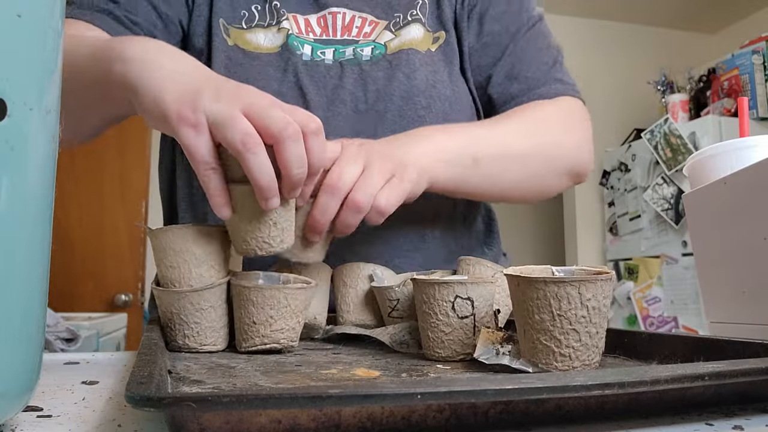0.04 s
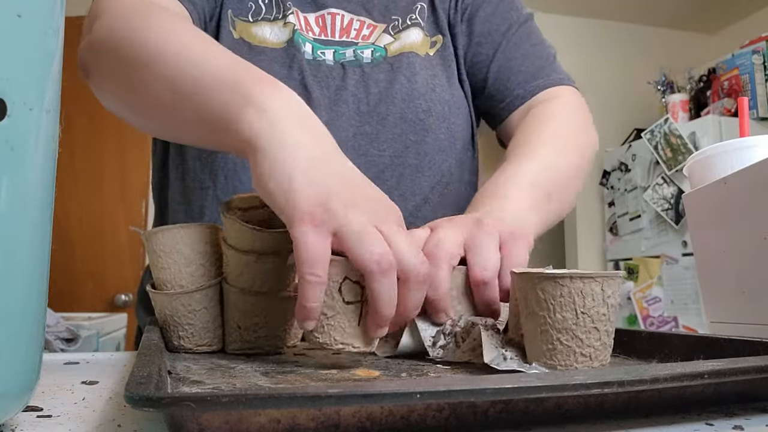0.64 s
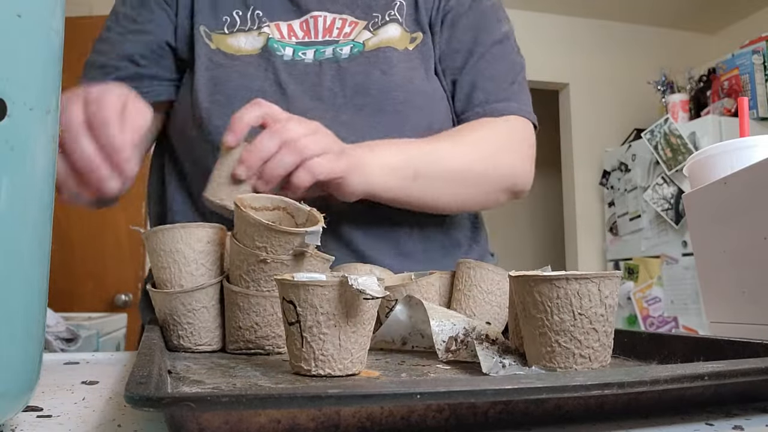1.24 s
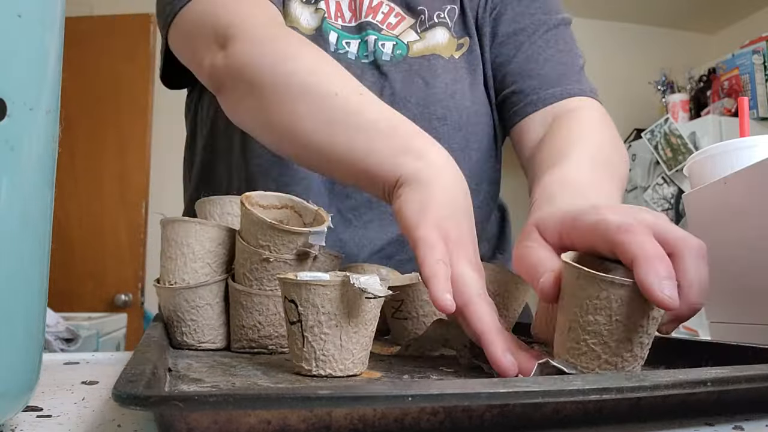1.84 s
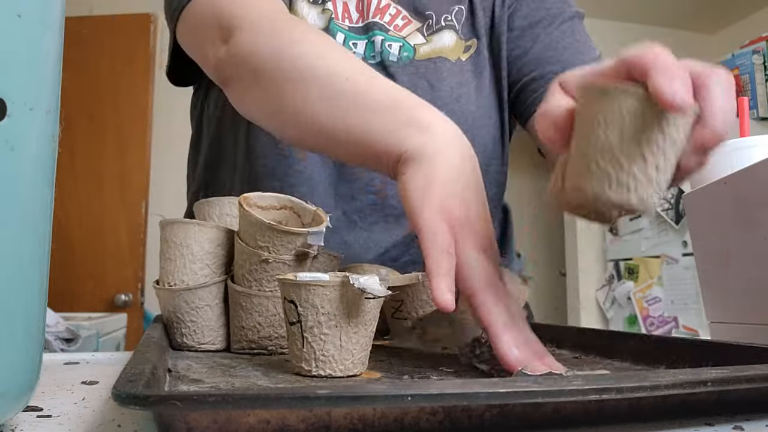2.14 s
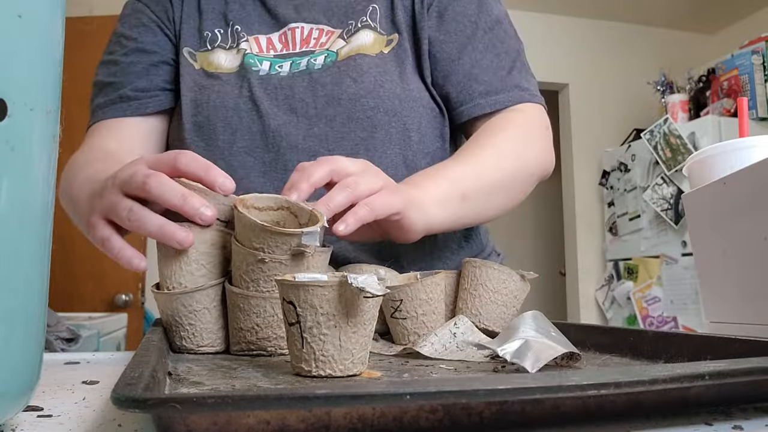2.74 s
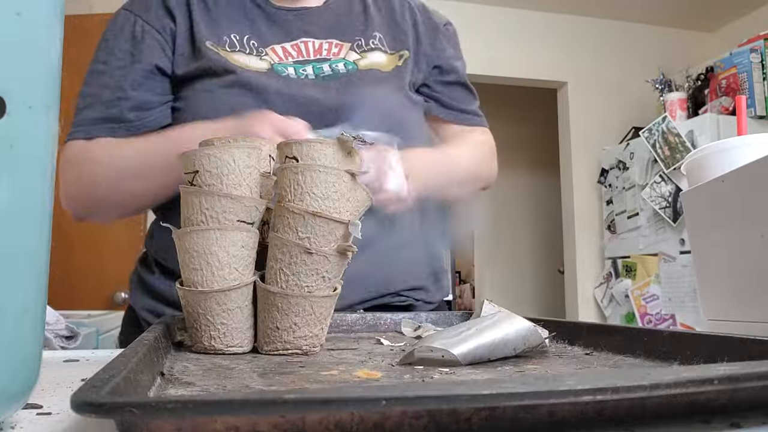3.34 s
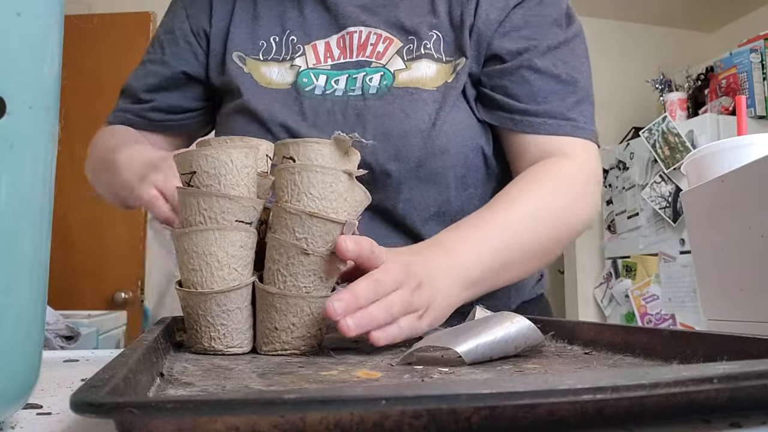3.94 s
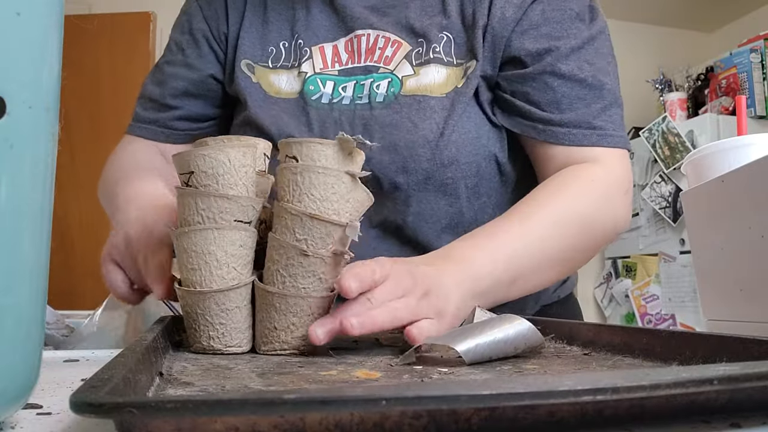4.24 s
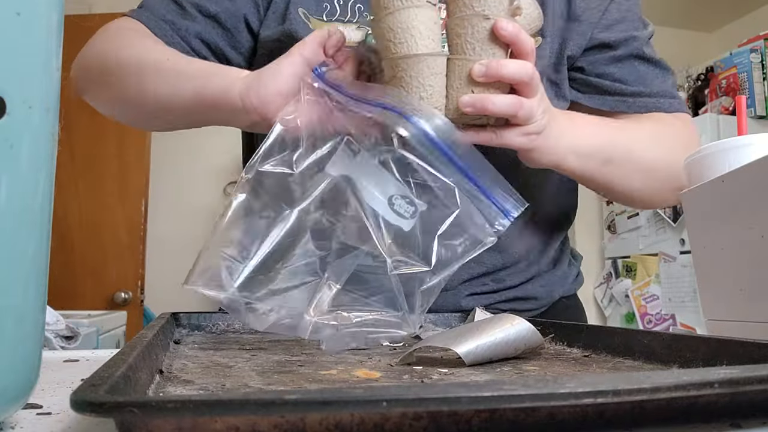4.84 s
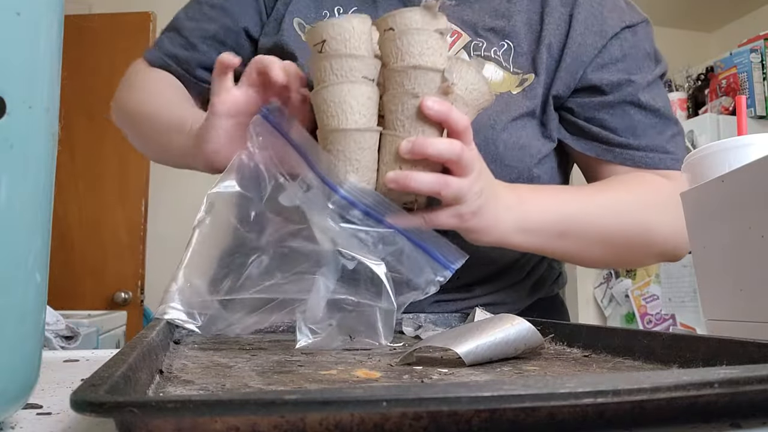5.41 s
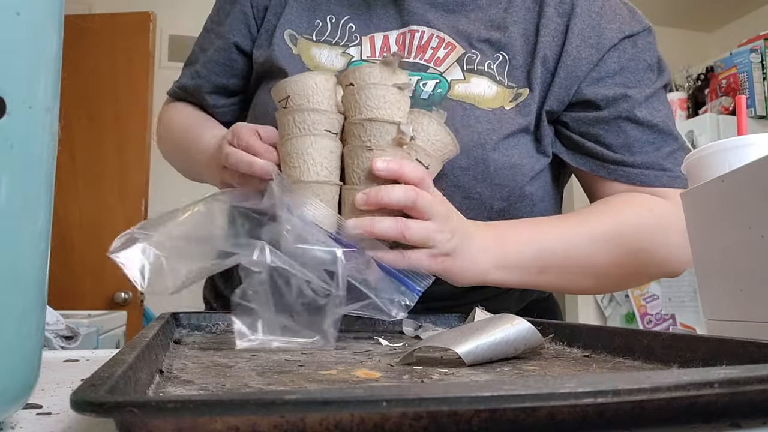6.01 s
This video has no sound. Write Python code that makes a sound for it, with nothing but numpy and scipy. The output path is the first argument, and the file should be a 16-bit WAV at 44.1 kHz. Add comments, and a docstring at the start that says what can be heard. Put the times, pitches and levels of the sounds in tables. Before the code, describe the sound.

Fibre plant pots knock and scrape on a metal tray, a foil packet snaps, then a plastic bag is shaken and crinkles.

```python
"""Fibre plant pots knock and rasp as they are nested and set down on a metal baking tray, close up in a
small kitchen. Their rough walls catch and slip, the tray booms under them, and a pressed foil seed
packet snaps as its creases flip. From 3.2 s a plastic zip bag is shaken open: it crinkles, flaps and
hisses, wall on wall, while the stacks are gathered up. Arms bump softly against stacks and bag."""
import sys
import numpy as np
from scipy import signal
from scipy.fft import rfft, irfft
from scipy.io import wavfile
from scipy.ndimage import uniform_filter1d

SR = 44100
rng = np.random.default_rng(int(sys.argv[2]) if len(sys.argv) > 2 else 0)


def file_out(sig):
    """Save sig as 16-bit WAV at sys.argv[1]."""
    # one column per channel
    cols = np.atleast_2d(sig).T
    # limit, then scale
    lim = np.clip(cols, -1, 1)
    pcm = np.round(lim * 32767).astype(np.int16)
    wavfile.write(sys.argv[1], SR, pcm)


N = 272097
TIME_S = np.arange(N) / SR
SCENE_CHANGE_S = 3.18  # the scene changes from pots to bag

# All levels are relative.
# pot on tray or pot: t/s, level/dB, hardness cutoff/Hz, tray boom/dB, hollow note/dB, clack/dB
POT_KNOCKS = [(0.07, -46.5, 497, -8, -17, -25), (0.2544, -30.5, 870, -21, -1.5, -17),
              (0.3476, -35, 900, -26, -0.5, -19), (.777, -28, 1210, -17, -17, -4),
              (.784, -24, 640, -4.5, -15, -23), (0.9793, -31.5, 1510, -20, -2.5, -15.5),
              (1.323, -47.5, 890, -20, -15, -14), (1.357, -43, 495, -16, -9, -27),
              (1.414, -51.5, 407, -1, -12, -8), (1.722, -46, 497, -17, -8, -4),
              (2.1684, -31, 645, -12.5, -1.5, -16.5), (2.276, -33.5, 556, -26, -15, -14.5),
              (2.882, -47, 600, -30, -20, -20)]
# loaded tray: f/Hz, level/dB, t60/s
TRAY_MODES = [(118, -23, 0.17), (159.7, 0, 0.32), (176.8, 6, 0.19), (216, -4, 0.26), (243, 3, 0.15),
              (267.4, -4, 0.33), (322, 5.5, 0.12), (386, 4.5, 0.13), (446, 0, 0.35), (500, 3.5, 0.18),
              (651, 1, 0.18), (720, -3.5, 0.34), (705, 3.5, 0.39), (966, -0.5, 0.4), (1580, -4, .13)]
# pot sliding in a pot or under fingers: peak t/s, rise/s, fall/s, rasp/dB, shudder/dB, fizz offset/dB
POT_SLIDES = [(0.108, 0.04, 0.065, -43.5, -43.5, -18), (0.197, 0.027, 0.045, -39, -37, -47),
              (.312, 0.056, 0.026, -48, -49, -16), (.371, 0.023, 0.053, -43.5, -41, -9),
              (0.46, 0.04, 0.21, -49, -53, -34), (.745, 0.038, 0.071, -50, -59.5, -25),
              (0.784, 0.016, 0.097, -44, -45, -47), (.936, 0.032, 0.022, -47.5, -48.5, -13.5),
              (1.331, 0.0045, 0.052, -51.5, -48, -23), (1.523, 0.11, 0.075, -59, -57.5, -12),
              (1.713, 0.044, 0.02, -39.5, -41.5, -14.5), (1.77, 0.039, 0.062, -53.5, -50, -17),
              (1.855, 0.0035, 0.061, -38.5, -46.5, -19), (1.912, 0.018, 0.02, -47, -42, 1.5),
              (2.146, 0.02, 0.023, -41.5, -49.5, -4), (2.301, 0.0097, 0.005, -45, -47, 0.5),
              (2.471, 0.08, 0.049, -50, -55.5, -21), (2.621, 0.073, 0.088, -52.5, -52, -15.5),
              (2.83, 0.09, 0.22, -56.5, -57.5, -38), (2.99, 0.024, 0.079, -53, -54, -29),
              (3.11, 0.058, 0.048, -51.5, -54.5, -37)]
# pot spectra: f/Hz, level/dB
WALL_THUD = [(50, -14.5), (130, 2.5), (400, -0.5), (800, 1.5), (1100, -0.5), (2000, -6), (5000, -18),
             (12000, -37.5)]
RIM_CLACK = [(700, -24), (1400, 1.5), (1650, 7), (1850, -13), (2100, 5.5), (2600, -5), (9000, -24.5)]
WALL_RASP = [(500, -57.5), (1100, -6), (2000, 6.5), (3500, 6.5), (5500, 5), (8000, -1.5), (11000, -9.5),
             (16000, -15.5)]
FIBRE_FIZZ = [(2000, -25.5), (5000, -4), (8000, -7), (16000, -16.5)]
STACK_SHUDDER = [(50, -30.5), (110, -8), (185, -3.5), (300, -13.5), (400, -7.5), (550, -18.5), (750, -7),
                 (880, -12), (1100, -7.5), (1600, -16), (3000, -51)]
# foil creases flipping: t/s, level/dB, ring f/Hz, ring/dB, pop/dB, crack time constant/s
FOIL_CREASES = [(.3828, -25, 5600, -6, -11, 0.0011), (.3857, -13.5, 5520, -9, -13, 0.00037),
                (.3878, -17, 5630, -1.5, -18, 0.00042), (.4143, -15.5, 5210, -5, -7.5, 0.0018),
                (.4200, -19.5, 5150, 2, 3, 0.0012), (.4706, -15.5, 5000, -6, -4.5, 0.0006),
                (.5008, -29.5, 3250, -12, 1, 0.00062), (.5208, -18, 3420, -11.5, -4, 0.00063)]
# foil crack spectrum: f/Hz, level/dB
FOIL_CRACK = [(200, -23), (450, -22), (750, -15), (1100, -14.5), (2100, -4), (3300, -5), (5300, 0),
              (8000, -7), (11000, -9.5), (16000, -25)]
# arms against stacks and bag: t/s, half width/s, level/dB, low spectral peak f/Hz
ARM_BUMPS = [(2.273, 0.085, -45.5, 54), (4.699, 0.19, -53, 67.4), (6.055, 0.016, -42.5, 71)]
# soft handling spectrum, low peak at 55 Hz: f/Hz, level/dB
SOFT_RUMBLE = [(15, -16), (35, -8.5), (55, 3), (80, 0), (120, 3), (200, -5), (400, -52)]
# bag shaken, then shifted: peak t/s, rise/s, fall/s, crinkle/dB, flap/dB, pushed air/dB
BAG_MOTION = [(3.25, 0.041, 0.13, -25.5, -31.5, -45), (3.5, 0.03, 0.1, -45.5, -62, -74),
              (3.6, 0.036, 0.016, -36.5, -41.5, -58), (3.77, 0.057, 0.02, -51, -46, -55.5),
              (3.92, 0.072, 0.056, -44, -46.5, -53.5), (4.06, 0.053, 0.041, -45.5, -50, -59),
              (4.32, 0.066, 0.11, -50.5, -48, -58.5), (4.54, 0.078, 0.063, -49, -51.5, -58.5),
              (4.76, 0.14, 0.17, -50, -53, -56.5), (5.17, 0.1, 0.21, -43, -47, -58.5),
              (5.35, 0.038, 0.024, -43.5, -55, -66), (5.46, 0.05, 0.086, -43.5, -49, -52.5),
              (5.61, 0.048, 0.026, -39.5, -38, -48), (5.73, 0.063, 0.13, -39.5, -48, -53),
              (5.95, 0.086, 0.09, -39, -50.5, -55), (6.07, 0.046, 0.026, -39.5, -40.5, -46),
              (6.168, 0.025, .03, -40.5, -41, -61)]
# loudest bag creases: t/s, level/dB, ring f/Hz, ring/dB, crack time constant/s
BAG_CREASES = [(3.2011, -19, 5310, -11, 0.0013), (3.208, -26, 3980, -4, .0008),
               (3.2226, -15, 6230, -14, 0.00063), (3.228, -17.5, 6200, -13, 0.0022),
               (3.2625, -28, 4500, -6, 0.00072), (3.281, -22, 5400, -6, 0.00044),
               (3.306, -26, 4830, -2, 0.00077), (3.3195, -22.5, 5220, -13, 0.001),
               (3.369, -23, 3500, -8.5, 0.0058), (3.4619, -28, 5960, -10, 0.00058),
               (3.477, -40, 1990, 11, .002), (3.525, -40, 1650, -5, 0.0017),
               (3.580, -32.5, 4720, -7, 0.0036), (3.591, -47, 2240, -10, 0.0033),
               (3.659, -45.5, 2110, -9, 0.00089), (3.7236, -43.5, 3000, -16, 0.0019),
               (3.76, -36, 2220, -8, 0.0027), (3.766, -39, 1710, -1, 0.0017),
               (3.809, -40.5, 2970, -5, 0.003), (3.8437, -40.5, 3080, -18, 0.001),
               (3.86, -45.5, 2200, -4, 0.001), (4.012, -40.5, 1060, -5, 0.0044),
               (4.727, -39.5, 3480, -29, 0.00049), (4.772, -37, 3080, -10, 0.00083),
               (4.797, -48, 3180, 4, 0.0017), (5.0462, -39.5, 4950, -17, 0.00097),
               (5.1218, -31.5, 4770, -13, 0.0019), (5.1812, -28.5, 3200, -5.5, 0.0017),
               (5.2026, -31, 5640, 1, 0.00069), (5.4119, -34, 7750, -13, 0.00044),
               (5.419, -35.5, 1600, 1.5, 0.0016), (5.582, -40, 3210, -13, 0.0015),
               (5.6212, -33, 4100, -7, 0.0027), (5.7039, -27.5, 5630, -18, 0.0015),
               (5.739, -31, 5240, -6.5, 0.001), (5.7739, -28.5, 3200, -9.5, 0.00024),
               (5.8483, -29, 3220, 10, 0.0009), (5.8486, -36, 2180, 2, 0.001),
               (6.059, -41, 5900, -20, 0.00065)]
# bag wall sliding on wall: peak t/s, rise/s, fall/s, level/dB
BAG_SLIDES = [(5.125, 0.063, .022, -51), (5.18, 0.027, .028, -58), (5.45, 0.036, 0.058, -48.5),
              (5.71, 0.033, 0.023, -44.5), (5.74, 0.004, 0.0041, -34), (5.96, 0.18, 0.14, -56)]
# bag spectra: f/Hz, level/dB
BAG_CRINKLE = [(300, -13), (700, -7), (1100, 3.5), (1700, 2.5), (3200, -2), (5400, -2), (8000, -9.5),
               (11000, -18.5), (16000, -28)]
BAG_FLAP = [(100, -28), (230, -5.5), (380, -3.5), (600, -4), (800, -1.5), (1100, 2), (1600, 1),
            (3000, -53.5)]
FILM_HISS = [(1000, -40), (3000, -5), (7000, -1.5), (10500, -6.5), (16000, -10)]
# still kitchen air: f/Hz, level/dB
ROOM_AIR = [(20, 8), (120, -2.5), (450, -8.5), (700, -12), (1500, -36), (5500, -13), (8000, -13.5),
            (16000, -35.5)]
# kitchen decay: f/Hz, t60/s
ROOM_T60 = [(100, 0.38), (300, 0.28), (800, 0.13), (2000, 0.19), (5000, 0.2), (9000, 0.14), (16000, 0.24)]
# microphone pair: f/Hz, left-right correlation
MIC_CORRELATION = [(100, 0.99), (300, 0.97), (700, 0.82), (1200, -0.37), (2000, -0.36), (5000, 0.015),
                   (16000, -0.072)]
# microphone response, common and left over right: f/Hz, level/dB
MIC_RESPONSE = [(950, 0.5), (1110, 1), (1300, -11.5), (1480, -5), (1700, -4), (2130, -1), (2500, -4),
                (3350, 2.5), (4300, -0.5), (5400, 0), (6700, -3.5), (8100, -4.5), (9400, -16), (10500, -14),
                (12500, -7.5)]
MIC_BALANCE = [(250, 0.5), (1000, 0), (2000, -2.8), (4500, 1), (8000, 0.5), (12000, -1)]


def amp(db):
    """dB to gain."""
    return 10 ** (np.asarray(db) / 20)


def unit(x):
    """Scale to rms 1."""
    return x / np.sqrt(np.mean(x ** 2) + 1e-20)


def with_energy(x, energy):
    """Scale to a mean sum of squares per channel."""
    return unit(x) * np.sqrt(energy / x.shape[-1])


def lookup(table, hz):
    """Interpolate over log frequency."""
    table_hz, value = np.transpose(table)
    return np.interp(np.log(hz + 1), np.log(table_hz + 1), value)


def add(mix, at_s, sound):
    """Mix in a stereo sound."""
    part = mix[:, max(round(at_s * SR), 0):][:, :sound.shape[1]]
    part += sound[:, :part.shape[1]]


def colour(x, spectrum, size=4096):
    """Minimum-phase filter with the given spectrum."""
    log_gain = np.log(amp(lookup(spectrum, abs(np.fft.fftfreq(size, 1 / SR)))))
    taps = np.fft.ifft(np.exp(np.conj(signal.hilbert(log_gain)))).real[:size // 2]
    return signal.fftconvolve(x, taps[None], axes=1)[:, :x.shape[1]]


def stereo_angle(hz):
    """Mid-side angle in rad for the pair's correlation."""
    return np.arccos(np.clip(lookup(MIC_CORRELATION, hz), -1, 1)) / 2


def noise(size):
    """Stereo white noise: alike in the bass, apart in the treble."""
    z = rfft(rng.standard_normal((2, size)))
    angle = stereo_angle(np.fft.rfftfreq(size, 1 / SR))
    mid, side = z[0] * np.cos(angle), z[1] * np.sin(angle)
    return irfft(np.array([mid + side, mid - side]), size)


def grains(per_s, spread_db, grain_s, bed):
    """Tiny uneven slips, each a noise burst, over a bed too dense to resolve."""
    power = amp(spread_db * np.minimum(rng.exponential(1, N), 4)) ** 2
    power *= rng.random(N) < per_s / SR
    power = signal.lfilter([1], [1, -np.exp(-1 / (grain_s * SR))], power)
    power /= uniform_filter1d(power, size=4000) + 1e-9
    return noise(N) * np.sqrt(abs(power) + bed)


def patchy(x, depth_db):
    """Resonances come and go as material bends: patches a few hundred Hz wide, some 30 ms long."""
    z = signal.stft(x, SR, nperseg=512)[2]
    field = uniform_filter1d(rng.standard_normal(z.shape[1:]), size=4, axis=0)
    field = uniform_filter1d(field, size=6, axis=1)
    return signal.istft(z * amp(depth_db * unit(field)), SR, nperseg=512)[1][:, :N]


def swell(peak_s, rise_s, fall_s):
    """Speed of one hand movement: gathers, peaks, dies away."""
    width_s = np.where(TIME_S < peak_s, rise_s, fall_s)
    return np.exp(-np.minimum(((TIME_S - peak_s) / width_s) ** 2, 20))


def motion(moves, held, column, rest_db, trim_db):
    """Gain from one dB column of moves, over a resting level while held; trim acts on both."""
    power = sum((amp(row[column]) * swell(*row[:3])) ** 2 for row in moves)
    return amp(trim_db) * np.sqrt(power + amp(rest_db) ** 2 * held)


def pot_knocks(thud_s=0.035, push_hz=205, push_s=0.0022, hollow_hz=770, hollow_s=0.019, clack_s=0.032):
    """A blow: tray modes, dead fibre thud, low push, hollow note, papery clack. Soft blows are duller."""
    out, t = np.zeros((2, N)), np.arange(SR // 2) / SR
    mode_hz, mode_db, t60_s = np.transpose(TRAY_MODES)[:, :, None]
    angle = stereo_angle(mode_hz)
    for at_s, level_db, cutoff_hz, boom_db, hollow_db, clack_db in POT_KNOCKS:
        phase = rng.uniform(0, 2 * np.pi, mode_hz.shape)
        phase = phase + np.array([angle, -angle]) * rng.choice([-1, 1], mode_hz.shape)
        spot_db = 2 * rng.standard_normal(mode_hz.shape)  # the struck spot favours some modes
        modes = amp(mode_db + spot_db - 60 * t / t60_s) * np.sin(2 * np.pi * mode_hz * t + phase)
        thud = unit(colour(noise(len(t)) * np.exp(-t / thud_s), WALL_THUD))
        push = unit(t * np.exp(-t / push_s) * np.sin(2 * np.pi * push_hz * t))
        hollow = unit(np.exp(-t / hollow_s) * np.sin(2 * np.pi * hollow_hz * t))
        clack = unit(colour(noise(len(t)) * np.exp(-t / clack_s), RIM_CLACK))
        blow = amp(-1) * unit(modes.sum(1)) + amp(-4) * thud + amp(-6) * push + amp(hollow_db) * hollow
        blow = unit(signal.lfilter(*signal.butter(1, cutoff_hz, fs=SR), blow))
        blow = with_energy(blow + amp(clack_db) * clack, 700)
        add(out, at_s, amp(level_db) * (blow + amp(boom_db) * tray_boom(t)))
    return out


def tray_boom(t, hz=116, rise_s=0.03, chatter_db=-9):
    """The whole tray swings a few cycles; the pots chatter at each crest."""
    swing = np.sin(2 * np.pi * hz * t)
    crests = np.maximum(swing, 0) ** 8
    chatter = unit(colour(noise(len(t)) * crests, WALL_THUD))
    envelope = (t / rise_s * np.exp(1 - t / rise_s)) ** 2
    return envelope * (swing + amp(chatter_db) * chatter)


def pot_slides(fizz_trim_db=6, sway_db=-13.5):
    """Rough fibre walls catch and slip, shaking the stack."""
    held = TIME_S < SCENE_CHANGE_S
    rasp_gain = motion(POT_SLIDES, held, column=3, rest_db=-68.5, trim_db=-2)
    shudder_gain = motion(POT_SLIDES, held, column=4, rest_db=-70, trim_db=-2)
    fizz_gain = sum(amp(rasp_db + fizz_db + fizz_trim_db) * swell(*timing_s)
                    for *timing_s, rasp_db, _, fizz_db in POT_SLIDES)
    slips = patchy(grains(per_s=1400, spread_db=4, grain_s=0.0008, bed=0.78), depth_db=2.3)
    hiss = rasp_gain * unit(colour(slips, WALL_RASP)) + fizz_gain * unit(colour(slips, FIBRE_FIZZ))
    shudder = unit(colour(slips, STACK_SHUDDER)) + amp(sway_db) * rumble()
    return hiss * amp([[0.8], [-0.8]]) + shudder_gain * shudder


def rumble():
    """Low, dull noise of something soft being moved."""
    return unit(colour(noise(N), SOFT_RUMBLE))


def snaps(rows, spectrum, ring_s, nominal_pop_hz, pop_s, scatter_db, scatter_s, wet_db):
    """A crease flips: a crack with a brief scattered tail, a hollow pop, a nearly dry facet ring."""
    cracks, rings, t = np.zeros((2, N)), np.zeros((2, N)), np.arange(3072) / SR
    for at_s, level_db, ring_hz, ring_db, pop_db, crack_s in rows:
        scatter = amp(scatter_db) * unit(np.exp(-t / scatter_s) * (t > crack_s))
        envelope = unit(t * np.exp(-t / crack_s)) + scatter
        crack = unit(colour(noise(len(t)) * envelope, spectrum))
        ring_phase = 2 * np.pi * (ring_hz * t + rng.uniform(0, 0.2, (2, 1)))
        ring = amp(ring_db) * unit(t * np.exp(-t / ring_s) * np.sin(ring_phase))
        pop_hz = nominal_pop_hz * rng.uniform(0.78, 1.127)
        pop = amp(pop_db) * unit(t * np.exp(-t / pop_s) * np.sin(2 * np.pi * pop_hz * t))
        energy = np.sum((crack + ring + pop) ** 2, axis=1).mean()
        gain = amp(level_db) * np.sqrt(190 / energy)
        add(cracks, at_s, gain * (crack + pop))
        add(rings, at_s, gain * ring)
    return kitchen(cracks, wet_db) + kitchen(rings, wet_db=-15)


def foil_snaps():
    """Creases of the pressed packet give way."""
    return snaps(FOIL_CREASES, FOIL_CRACK, ring_s=0.00075, nominal_pop_hz=849, pop_s=0.00076,
                 scatter_db=9, scatter_s=0.0045, wet_db=-6)


def arm_bumps(trim_db=-3):
    """Soft contact with stacks and bag: swells of low noise."""
    out, t = np.zeros((2, N)), np.arange(SR) / SR - 0.5
    for at_s, half_s, level_db, peak_hz in ARM_BUMPS:
        spectrum = np.array(SOFT_RUMBLE) * [peak_hz / 55, 1]
        thump = unit(colour(noise(len(t)), spectrum))
        envelope = np.exp(-np.minimum((t / half_s) ** 2, 20))
        add(out, at_s - 0.5, amp(level_db + trim_db) * thump * envelope)
    return out


def bag_rustle():
    """Countless small creases tick while the loose sheet flaps and pushes air."""
    held = TIME_S > SCENE_CHANGE_S
    crinkle_gain = motion(BAG_MOTION, held, column=3, rest_db=-60, trim_db=-3)
    flap_gain = motion(BAG_MOTION, held, column=4, rest_db=-59.5, trim_db=-2)
    air_gain = motion(BAG_MOTION, held, column=5, rest_db=-74, trim_db=-2)
    ticks = patchy(grains(per_s=310, spread_db=4, grain_s=0.0016, bed=0.59), depth_db=3.3)
    crinkle, flap = unit(colour(ticks, BAG_CRINKLE)), unit(colour(ticks, BAG_FLAP))
    return crinkle_gain * crinkle + flap_gain * flap + air_gain * rumble()


def bag_snaps(ref_pop_db=-8.5, ref_hz=3430, ref_level_db=-22.5):
    """Single loud creases; large, low facets and hard snaps pop more."""
    rows = []
    for at_s, level_db, ring_hz, ring_db, crack_s in BAG_CREASES:
        pop_db = ref_pop_db - 5 * np.log2(ring_hz / ref_hz) + 0.33 * (level_db - ref_level_db)
        rows.append((at_s, level_db, ring_hz, ring_db, pop_db, crack_s))
    return snaps(rows, BAG_CRINKLE, ring_s=0.0008, nominal_pop_hz=980, pop_s=0.00053,
                 scatter_db=-1, scatter_s=0.0098, wet_db=-3)


def sharpen_creases(x, treble_db=18, treble_hz=8520, knee_db=-31):
    """Hard crumpling breaks sharper creases: top treble grows with force."""
    force = np.sqrt(abs(uniform_filter1d((x ** 2).mean(0), size=800)))
    treble = signal.sosfiltfilt(signal.butter(2, treble_hz, "high", fs=SR, output="sos"), x)
    return x + amp(treble_db) * treble * force / (force + amp(knee_db))


def film_hiss():
    """Plastic slips on plastic: a thin, very high hiss."""
    slips = grains(per_s=1000, spread_db=6.5, grain_s=0.0011, bed=0.4)
    gain = sum(amp(level_db) * swell(*timing_s) for *timing_s, level_db in BAG_SLIDES)
    return gain * unit(colour(slips, FILM_HISS))


def kitchen(x, wet_db, predelay_s=0.003):
    """Add a short room tail; each band decays at its own rate."""
    size = SR // 2
    hz, frame_s, z = signal.stft(noise(size), SR, nperseg=256)
    decay = amp(-60 * frame_s / lookup(ROOM_T60, hz)[:, None])
    tail = signal.istft(z * decay, SR, nperseg=256)[1][:, :size]
    tail *= np.arange(size) / SR > predelay_s
    return x + amp(wet_db) * signal.fftconvolve(x, with_energy(tail, 1), axes=1)[:, :N]


def scene():
    """Pots and packet close, bag farther off, over still air."""
    foil = foil_snaps() * amp([[1], [-1]])
    bag = kitchen(bag_rustle() + film_hiss(), wet_db=-2.5) + bag_snaps()
    bag = sharpen_creases(bag) * amp([[0.4], [-0.4]])
    pots = kitchen(pot_knocks(), wet_db=-7) + kitchen(pot_slides(), wet_db=-4.5)
    air = amp(-60.5 - 2) * unit(colour(noise(N), ROOM_AIR))
    return pots + foil + bag + air + arm_bumps()


def record(dry):
    """Microphone colour and balance, then a band limit."""
    lean_db = lookup(MIC_BALANCE, np.fft.rfftfreq(N, 1 / SR)) / 2
    heard = irfft(rfft(colour(dry, MIC_RESPONSE)) * amp([lean_db, -lean_db]), N)
    lowpass = signal.firwin(401, cutoff=16100, window=("kaiser", 9), fs=SR)
    return signal.oaconvolve(heard, lowpass[None], "same")


dry = scene()
out = record(dry)
file_out(out)
```